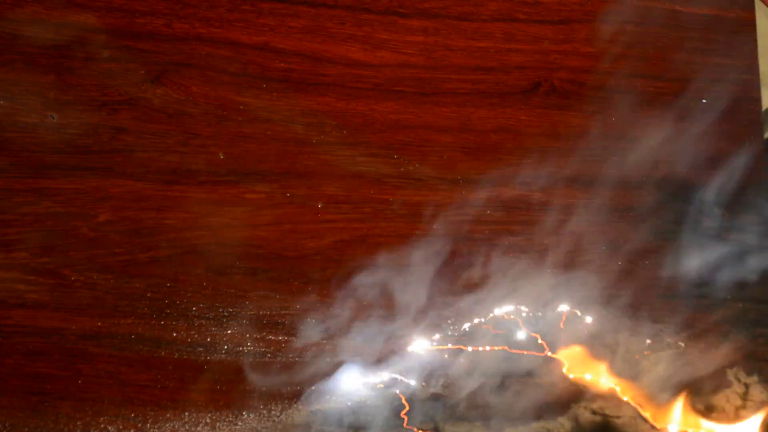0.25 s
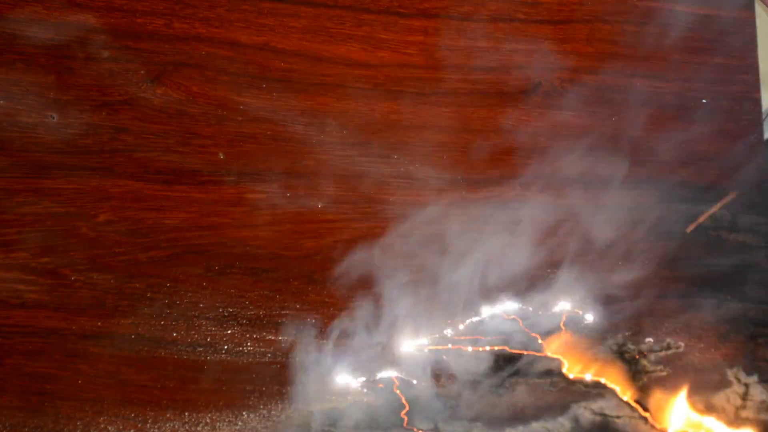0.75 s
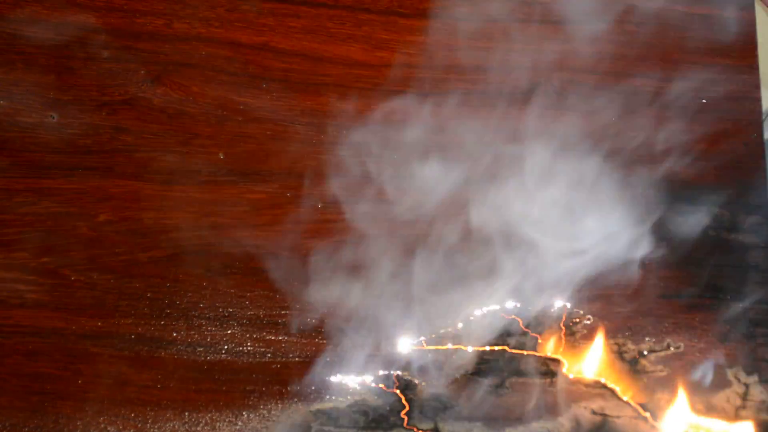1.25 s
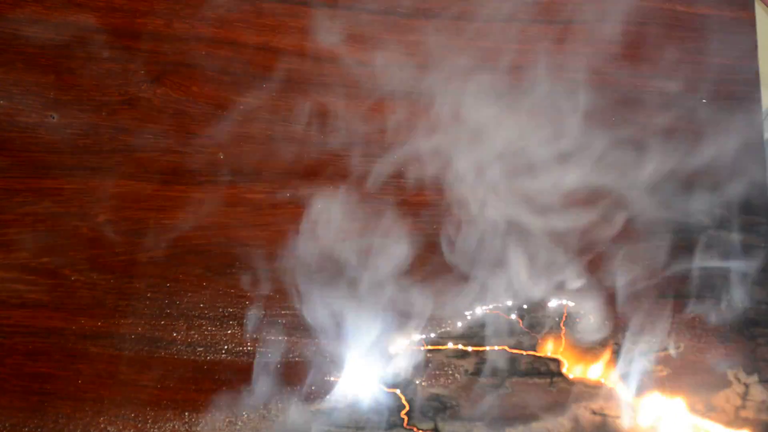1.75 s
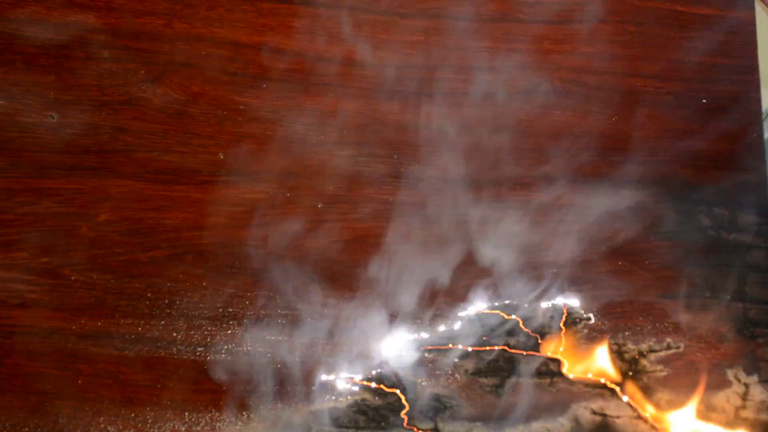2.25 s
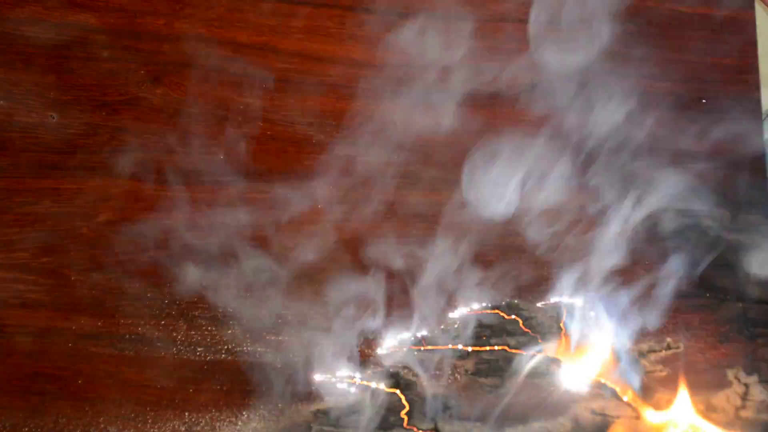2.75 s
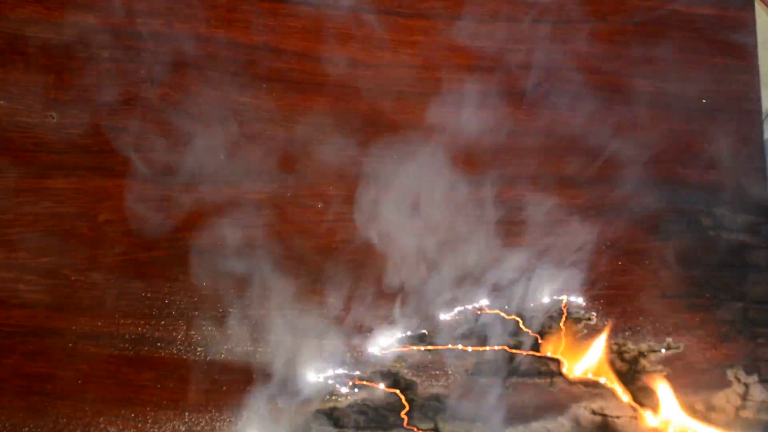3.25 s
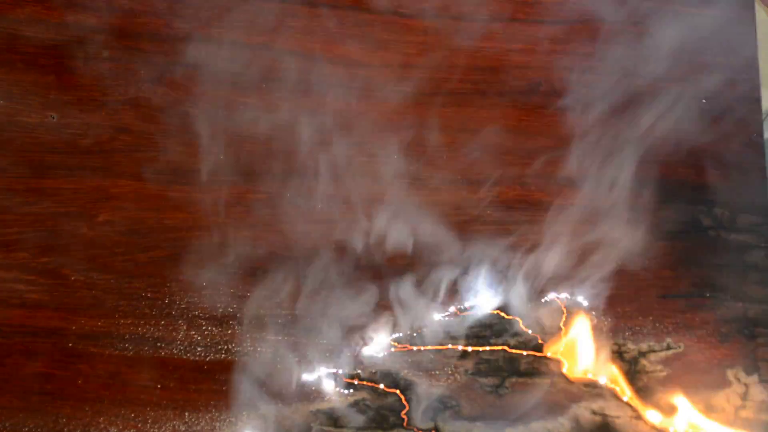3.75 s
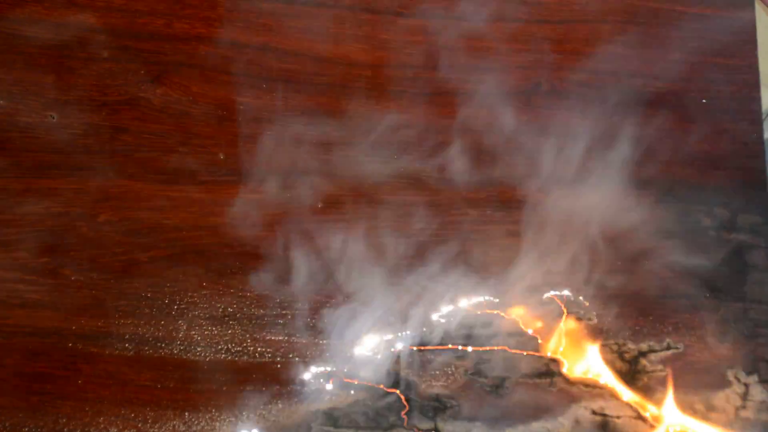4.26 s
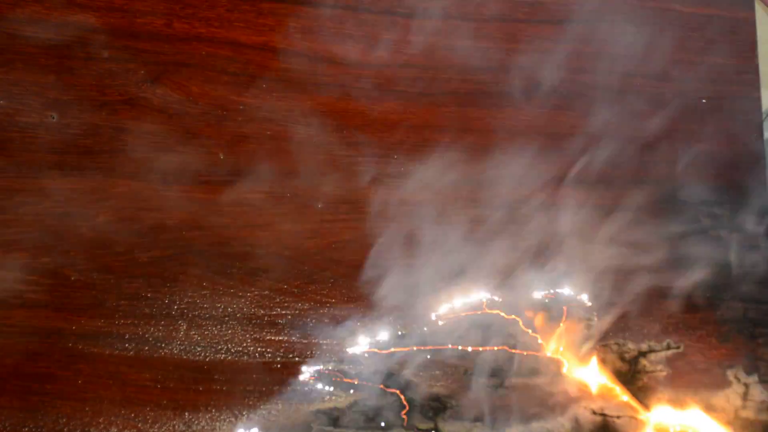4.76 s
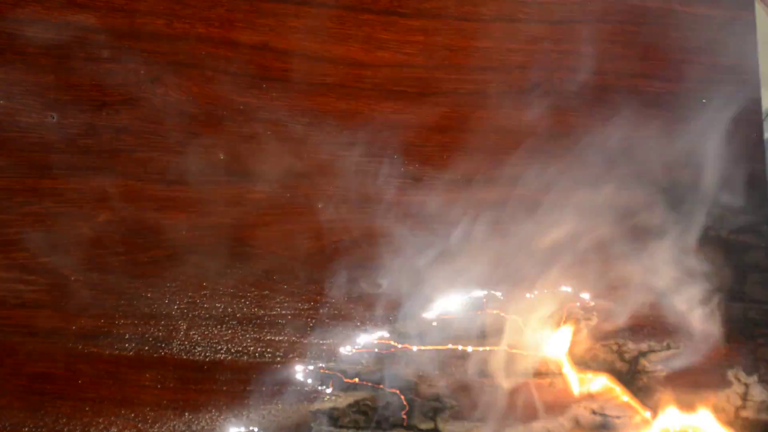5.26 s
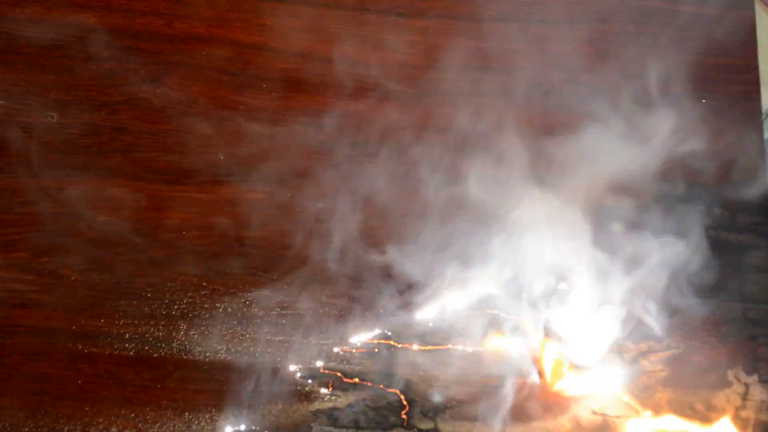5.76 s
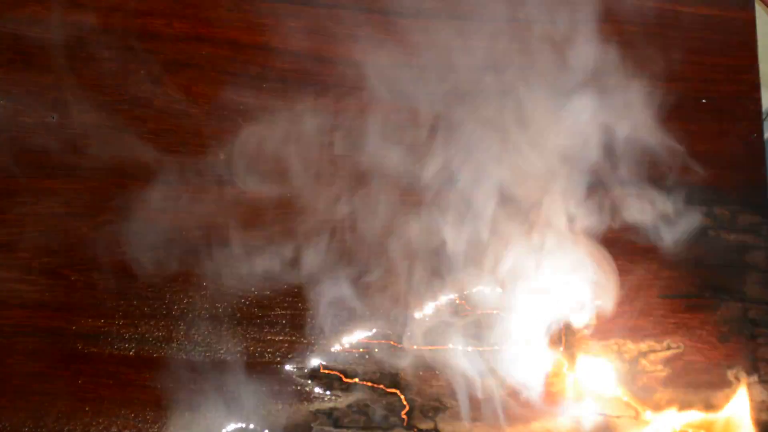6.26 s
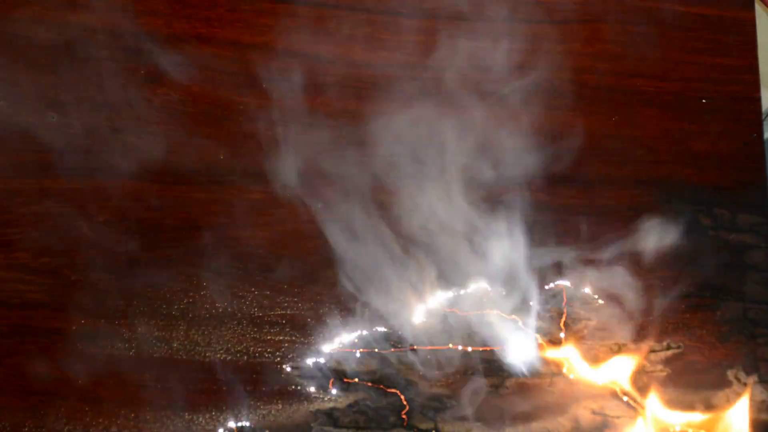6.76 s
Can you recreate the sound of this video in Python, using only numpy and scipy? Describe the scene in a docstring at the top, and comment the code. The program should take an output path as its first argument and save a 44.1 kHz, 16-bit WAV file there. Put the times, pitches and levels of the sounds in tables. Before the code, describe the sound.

Close in a small dry workshop, high-voltage arcs hiss with a mains-rate buzz over sizzling damp wood and a faint transformer hum. Dull woody pops and dry ticks come sparsely at first. Around three to four seconds bright sharp snaps and steam jets crowd in, one crack by far the loudest. Scattered pops, soft flame flaps and a brief crackle follow while the hiss continues.

```python
"""A transformer hums throughout, in mains multiples, as arcs on damp wood hiss and the track sizzles, in shaped noise.
From 0.2 s dull pops (noise bursts that ring the board) and dry ticks (filtered clicks) break out, with short steam rushes.
From 2.8 to 4 s bright snaps (short, high noise bursts) crowd in with steam jets (shaped noise), fiercest near 3.4 s.
Pops return from 4.5 s, most at 5.6 s; flames flap in low noise, once at 1.9 s and then between 4.5 and 6.4 s.
A spate of crackle comes at 6.2 s; arcs and sizzle run on to the end, in a small, short-ringing shop."""
import sys
import numpy as np
from scipy import signal
from scipy.fft import rfft, irfft, next_fast_len
from scipy.io import wavfile

SR = 44100
rng = np.random.default_rng(int(sys.argv[2]) if len(sys.argv) > 2 else 0)


def transcribe(u):
    """Save the signal u as a 16-bit wav file named by the first command-line argument.

    u: samples, shape (n,) or (channels, n), limited to [-1, 1]; the rate is SR.
    q: integer samples, one column per channel.
    """
    v = np.clip(np.atleast_2d(u).T, -1, 1)
    q = np.round(v * 32767).astype(np.int16)
    wavfile.write(sys.argv[1], SR, q)


def convert_level_to_amplitude(level_db):
    """Map a level in decibels to its linear amplitude factor."""
    exponent = np.asarray(level_db, float) / 20
    return 10 ** exponent


N = 309141

# Room air. Each row: frequency in Hz, level in dB per Hz.
ROOM_TONE_HZ_DB = [(20, -125), (50, -108), (90, -106), (200, -100), (500, -104), (2000, -115)]
# Transformer hum. Each row: multiple of the mains, level in dB rms.
HUM_MULTIPLE_DB = [(1, -92.5), (2, -69.5), (3, -74), (4, -67), (6, -81), (8, -75), (10, -77), (12, -79.5)]
# Side signal of the vents. Each row: frequency in Hz, gain in dB.
SIDE_HZ_DB = [(300, -26), (1200, -25), (5000, -16), (8000, -10), (14000, -9)]
# Flame flaring up. Each row: start of hold in seconds, hold in seconds, flutter level in dB.
FLARE_EVENTS = [(1.87, 0.027, -76), (4.47, 0.043, -71), (5.573, 0.02, -54), (5.62, 0.065, -64),
                (5.977, .01, -65), (6.163, .08, -81), (6.28, .015, -72), (6.32, 0.059, -71)]
# Air shoved aside as a pocket blows out. Each row: start in seconds, relative level in dB.
PUSH_EVENTS = [(3.4376, -39.5), (3.506, -52), (3.539, -43)]
# A crust gives way in extra ticks: start of hold in seconds, hold in seconds, ticks per second before clumping.
CRUST_SPATE = (6.17, 0.078, 710)
# Lone dry ticks of cracking char. Each row: start in seconds, peak in dB, pitch in Hz.
CHAR_TICKS = [(.2056, -29, 3000), (0.5997, -29, 2400), (.6043, -39, 1410), (.6158, -39, 1300),
              (.6493, -36, 2700), (1.2553, -27, 4500), (1.8837, -36, 2480), (3.7918, -33, 4000),
              (4.627, -27.5, 2300), (5.96, -39, 1300), (5.9928, -32, 2400), (6.1595, -30, 1290),
              (6.166, -32, 1700), (6.1678, -35, 2600), (6.194, -34, 1300), (6.2093, -35, 2200),
              (6.2455, -35, 1300), (6.2538, -35.5, 1090), (6.2654, -36, 2000), (6.279, -36.5, 700),
              (6.2992, -35, 1300), (6.3866, -34, 1400)]
# Modes of the board. Each row: frequency in Hz, relative level in dB, T60 in seconds.
BOARD_MODES = [(367, -25, .09), (443, -2, 0.26), (870, 4, .09), (1097, -8, 0.13), (1367, 2, 0.07),
               (1570, -6.5, .06), (1930, -4.5, 0.19), (2194, -6, 0.11), (2600, -12, 0.075),
               (3000, -19, 0.1), (3360, -29, .05)]
# Dull pops in the wood. Each row: time in seconds, burst peak in dB, pitch in Hz, relative thud level in dB
# (280 to 560 Hz), rise in ms.
POP_EVENTS = [(.2055, -29.5, 1340, -47, 0.27), (0.2049, -28.5, 2170, -58, 0.17),
              (.222, -42, 1110, -63, 7.2), (0.25, -38.5, 1940, -54, 7.3), (0.313, -48, 516, -51, 0.5),
              (0.414, -39, 1420, -46, 0.73), (0.4127, -43, 498, -61, 0.18), (.505, -43, 1110, -63, 3.),
              (0.439, -35, 1850, -54, 4.), (.465, -35, 4300, -70, 5.), (.458, -29.5, 2200, -56, 9.),
              (.698, -39, 2300, -70, 6.), (.722, -36, 1730, -68, 4.), (0.733, -43, 1600, -70, 2.2),
              (.75, -46, 1300, -70, 4.4), (1.252, -38, 2400, -65, 3.5), (1.2562, -33, 4280, -68, 1.),
              (1.2557, -30, 2270, -60, 0.78), (1.257, -33, 1700, -62, .8), (1.2603, -30, 1250, -58, 0.3),
              (1.417, -36.5, 1500, -55, 3.2), (1.425, -43, 1030, -65, 7.3), (1.44, -49, 950, -62, 5.3),
              (1.519, -41, 2230, -66, 8.5), (1.54, -45, 1800, -66, 8.3), (1.875, -38, 443, -45, 1.2),
              (1.88, -27, 2320, -53, 1.76), (1.883, -29, 975, -42, 1.16), (1.888, -34, 950, -50, 1.4),
              (1.895, -38, 2400, -55, 4.98), (2.283, -35.5, 3440, -65, 3.4),
              (2.7315, -30.5, 4470, -68, 0.19), (2.7322, -31.5, 1530, -66, 0.22),
              (2.7374, -26.5, 2120, -62, 0.25), (2.782, -40, 1770, -60, 8.3),
              (3.4385, -51, 1880, -36.5, 0.49), (3.4385, -36.5, 474, -40.5, 0.28),
              (3.927, -37.5, 1790, -60, 8.), (4.481, -44.5, 400, -44, 2.8), (4.897, -42, 2520, -65, 0.4),
              (5.5616, -33.5, 920, -44, 0.17), (5.5616, -25, 1900, -57, 1.15), (5.567, -36, 2030, -43, 0.9),
              (5.572, -37.5, 840, -60, 3.34), (5.581, -46, 1850, -46, 3.2),
              (5.9944, -37.5, 1660, -50, 0.25), (6.168, -39, 1900, -49, 2.4)]
# Bright snaps of bursting fibres. Each row: time in seconds, burst peak in dB, pitch in Hz,
# relative body level in dB (1.3 to 3.3 kHz).
SNAP_EVENTS = [(2.8208, -22, 14500, -51.5), (2.8265, -23, 14900, -53), (2.831, -26, 9500, -55),
               (2.8435, -24.5, 9800, -52), (2.971, -14.5, 14500, -47), (3.0695, -21, 6000, -50),
               (3.07, -18, 14200, -50), (3.2217, -15, 9500, -31.5), (3.2306, -14.5, 6300, -33),
               (3.2307, -12.5, 11000, -45), (3.321, -31, 5230, -41), (3.327, -28, 8900, -48),
               (3.426, -24, 12500, -59), (3.437, -3, 10200, -27), (3.446, -5, 9700, -39),
               (3.451, -7, 10000, -42), (3.47, -11.5, 12600, -49), (3.47, -15, 8500, -40),
               (3.4785, -16, 9700, -41), (3.506, -10, 14000, -42), (3.525, -12.5, 11600, -47),
               (3.5403, -7, 12600, -24), (3.5857, -20, 14000, -45), (3.593, -13.5, 8200, -48),
               (3.6887, -34, 4320, -30), (3.6945, -8, 6300, -27), (3.8106, -32.5, 4230, -59),
               (3.932, -22.5, 6000, -50), (4.026, -26, 8350, -53)]
# Steam jets. Each row: time of full flow in seconds, swell in dB per second, hold in seconds,
# low rush level in dB, high rush level in dB.
JET_EVENTS = [(0.454, 450, 0.019, -41, -42), (2.825, 900, 0.11, -69, -47), (0.72, 400, .03, -50, -62),
              (1.52, 300, .07, -50.5, -62), (2.987, 141, 0.064, -36, -34), (3.079, 200, 0.031, -43, -40),
              (3.438, 25000, 0.0072, -31, -24.5), (3.448, 4000, 0.0073, -32, -22.5),
              (3.478, 600, 0.11, -34, -29.5), (3.552, 138, 0.053, -40.5, -45),
              (3.592, 5000, 0.0011, -45, -28.5), (3.933, 8000, .003, -56, -40)]
# Jet colour, with a steep cutoff above 15.75 kHz that is not the steam's own.
# Each row: frequency in Hz, gain in dB.
JET_HZ_DB = [(150, -43), (330, -23), (670, -12), (1200, -4.5), (2200, -4), (3200, -7.5), (4300, -6),
             (6000, -7), (8400, -6.5), (12800, -7), (15750, -6.5), (16100, -45)]
# How fiercely the track burns. Each row: time in seconds, arc hiss level in dB, relative sizzle level in dB.
BURN_CURVE = [(0.0, -49, -46), (0.36, -47.5, -48.5), (0.67, -48, -47.5), (0.89, -50, -50.5),
              (1.19, -51.5, -50.5), (1.41, -50, -50), (1.84, -51, -49.5), (2.18, -47.5, -49.5),
              (2.53, -50, -51.5), (2.7, -49.5, -50), (3.75, -49, -50), (4.11, -50, -51),
              (4.5, -48.5, -50.5), (5.3, -49, -52), (5.65, -49.5, -52.5), (6.19, -50.5, -48.5),
              (6.67, -46.5, -53), (7.01, -48.5, -51)]
# Sizzle colour. Each row: frequency in Hz, gain in dB.
SIZZLE_HZ_DB = [(60, -31), (150, -14.5), (270, -8.5), (470, -4), (900, -1), (1800, -3.5), (3500, -6.5),
                (9000, -13), (13000, -25)]
# Current peaks of the two polarities. Each row: place in the mains cycle (0-1), sharpness, relative level in dB.
CURRENT_PEAKS = [(.435, 8.6, -6), (.87, 19, -10), (.995, 13, -6.5)]
# Arc colour, with a steep cutoff above 15.75 kHz that is not the arcs' own.
# Each row: frequency in Hz, gain in dB.
ARC_HZ_DB = [(400, -40), (700, -6), (1800, -7.5), (2400, -5.5), (5900, -7), (9200, -3.5), (11100, -2.5),
             (14000, 0.5), (15750, 1.5), (16100, -51)]

MAINS_HZ = 59.985
SHOP_T60_S, SHOP_DB, WALL_CUT_HZ = 0.1, -23.5, 43000
BENCH_ECHO_S, BENCH_ECHO_DB = 0.0018, -6.0
CUTOFF_HZ = 17000
FLARE_SWELL_DB_PER_S, FLARE_FADE_DB_PER_S = 500, 350
PUSH_RISE_S = 0.00089
# rate at a relative sizzle of -50 dB, before clumping; dB of rate per dB of sizzle
TICKS_PER_S, TICKS_FOLLOW_DB_PER_DB = 105, 2.1
TICK_WIDTH = 2  # band spans this factor either side of the pitch
BOARD_DB = -21.0
# T60 of a fast pop at -40 dB; more per 10 dB of peak and per ms of rise
POP_T60_S, POP_SIZE_GAIN_S, POP_RISE_GAIN_S = 0.075, 0.039, 0.012
# T60 at 10 kHz, longer for deeper snaps by this power of the pitch
SNAP_RISE_MS, SNAP_T60_S, SNAP_T60_POWER = 0.25, 0.048, 1
# sag as the pocket empties; least closing rate as the crack shuts
JET_SAG_DB_PER_S, JET_CLOSE_DB_PER_S = 44, 448
JET_CLOSE_SHARE = 0.78  # a crack that bursts open also shuts fast: share of its swell rate


def rms_one(x):
    """Scale to unit rms."""
    return x / np.sqrt(np.mean(x ** 2) + 1e-20)


def in_time(rows):
    """Each column of a table as a curve, sample by sample."""
    time_s, *columns = np.transpose(rows)
    return [np.interp(np.arange(N) / SR, time_s, column) for column in columns]


def shape(x, spectrum):
    """Colour a sound by a (Hz, dB) spectrum, interpolated over log frequency."""
    size = next_fast_len(N)
    hz = np.maximum(np.arange(size // 2 + 1) * SR / size, 1)
    point_hz, point_db = np.transpose(spectrum)
    gain = convert_level_to_amplitude(np.interp(np.log(hz), np.log(point_hz), point_db))
    return irfft(rfft(x, size) * gain, size)[..., :N]


def band(x, low_hz, high_hz):
    """Band-pass."""
    edges_hz = [low_hz, min(high_hz, 0.45 * SR)]
    return signal.sosfilt(signal.butter(2, edges_hz, "band", fs=SR, output="sos"), x)


def level(x, low_hz, high_hz):
    """Scale so that one band has unit rms."""
    return x / np.sqrt(np.mean(band(x, low_hz, high_hz) ** 2))


def drift(rate_hz):
    """Slow chance of unit rms: noise through two equal poles, computed every 40 samples."""
    r = np.exp(-80 * np.pi * rate_hz / SR)
    noise = rng.standard_normal(N // 40 + 2002)
    slow = signal.lfilter([1], [1, -2 * r, r * r], noise)[2000:]
    return np.interp(np.arange(N) / 40, np.arange(len(slow)), rms_one(slow))


def grains(per_s, spread_db):
    """Random clicks with a long-tailed spread of sizes."""
    sizes = convert_level_to_amplitude(spread_db * np.minimum(rng.exponential(1, N), 5)) * rng.choice([-1, 1], N)
    return sizes * (rng.random(N) < per_s / SR)


def envelope(at_s, hold_s, swell_db_per_s, fade_db_per_s, sag_db_per_s=0):
    """Gain that swells to 1, holds while sagging, then fades."""
    t = np.arange(N) / SR - at_s
    swell_db = abs(swell_db_per_s) * np.minimum(t, 0)
    sag_db = sag_db_per_s * np.clip(t, 0, hold_s)
    fade_db = fade_db_per_s * np.maximum(t - hold_s, 0)
    return convert_level_to_amplitude(np.maximum(swell_db - sag_db - fade_db, -120))


def along_track(x, spectrum, low_hz, high_hz, side_db):
    """Every grain comes from its own spot on the board, a little to the left or right."""
    scattered = convert_level_to_amplitude(side_db) * x * rng.choice([-1, 1], N)
    mid, side = shape(np.array([x, scattered]), spectrum)
    return level(mid + side * np.array([[1], [-1]]), low_hz, high_hz)


def bursts(events, width, crack_s, tail_db, wide_db, skirt, strike_db, body_hz, body_db):
    """A short crack, then a puff that dies away; both gather round the pitch, over a broad skirt and a body band."""
    out, t = np.zeros(N), np.arange(SR // 4) / SR
    for time_s, peak_db, hz, t60_s, event_body_db, rise_ms in events:
        noise = rng.standard_normal((2, len(t)))
        rise_s = rise_ms / 1000
        rise = np.minimum(1000 * t / np.clip(rise_ms, 0.05, 15), 1)
        after_s = np.maximum(t - rise_s, 0)
        tail = convert_level_to_amplitude(-60 * after_s / np.clip(t60_s, 0.005, 0.4))
        # a slow vent has a blunt crack
        crack = np.exp(-after_s / (crack_s + rise_s))
        puff = noise[0] * rise * (crack + convert_level_to_amplitude(tail_db) * tail)
        # the instant the wall gives way
        puff[round(rise_s * SR)] += convert_level_to_amplitude(strike_db) * np.sqrt(crack_s * SR)
        # the slower the vent, the vaguer the pitch
        spread = width + 0.0059 * rise_ms
        core = rms_one(band(puff, hz / spread, hz * spread))
        wide_hz = hz * skirt[0], hz * skirt[1]
        wide = rms_one(band(band(puff, *wide_hz), *wide_hz))
        burst = core + convert_level_to_amplitude(wide_db) * wide
        burst = convert_level_to_amplitude(peak_db) * burst / np.abs(burst).max()
        body = convert_level_to_amplitude(body_db) * rms_one(band(noise[1], *body_hz))
        body = body * tail * np.minimum(t / 0.0013, 1) * rise
        at = round((time_s - rise_s / 2) * SR)
        out[at:at + len(t)] += (burst + convert_level_to_amplitude(event_body_db) * body)[:N - at]
    return out


def room_tone():
    """Quiet low air of the shop, unlike in the two channels."""
    return shape(rng.standard_normal((2, N)) * np.sqrt(SR / 2), ROOM_TONE_HZ_DB)


def shop(x):
    """Six feedback delays a side, duller on every round."""
    size = next_fast_len(N + SR // 2)
    hz = np.arange(size // 2 + 1) * SR / size
    source, out = rfft(x, size), np.zeros((2, len(hz)), complex)
    for k, lag_s in enumerate(rng.uniform(0.0076, 0.032, 12)):
        delay = np.exp(-2j * np.pi * hz * lag_s)
        loop = convert_level_to_amplitude(-60 * lag_s / SHOP_T60_S) * delay / (1 + 1j * hz / WALL_CUT_HZ)
        out[k % 2] += loop / (1 - loop) * (-1) ** (k // 2)
    return irfft(out * source, size)[:, :N]


def hum():
    """Core and windings buzz on multiples of the mains, each wavering a little."""
    t = np.arange(N) / SR
    out = np.zeros(N)
    for k, db in HUM_MULTIPLE_DB:
        gain = np.sqrt(2) * convert_level_to_amplitude(db + 0.059 * k * drift(0.54))
        out += gain * np.sin(2 * np.pi * (k * MAINS_HZ * t + rng.random()))
    return out


def flares():
    """The flame flaps as fresh gas lights: lumpy low noise."""
    flap = band(band(rng.standard_normal(N), 95, 290), 95, 290) * convert_level_to_amplitude(1.5 * drift(25))
    gain = sum(convert_level_to_amplitude(db) * envelope(at_s, hold_s, FLARE_SWELL_DB_PER_S, FLARE_FADE_DB_PER_S)
               for at_s, hold_s, db in FLARE_EVENTS)
    return gain * rms_one(flap)


def pushes():
    """One slow pulse of pressure each."""
    start_s, push_db = np.transpose(PUSH_EVENTS)
    t = np.maximum(np.arange(N) / SR - start_s[:, None], 0) / PUSH_RISE_S
    return convert_level_to_amplitude(push_db - 7.5) @ (t * np.exp(1 - t))


def crackle(sizzle_db, tick_db=-34.0):
    """Small dull ticks that come in clumps, thicker as the sizzle grows."""
    at_s, hold_s, spate_per_s = CRUST_SPATE
    per_s = TICKS_PER_S * convert_level_to_amplitude(TICKS_FOLLOW_DB_PER_DB * (sizzle_db + 50))
    per_s = per_s + spate_per_s * envelope(at_s, hold_s, swell_db_per_s=304, fade_db_per_s=120)
    clicks = grains(per_s * convert_level_to_amplitude(2.2 * drift(8)), spread_db=3)
    return convert_level_to_amplitude(tick_db) * band(clicks, 660, 3900)


def ticks():
    """One click each, through a broad band: a cycle or two and gone."""
    out, click = np.zeros(N), np.r_[1., np.zeros(400)]
    for start_s, peak_db, hz in CHAR_TICKS:
        tick = band(click, hz / TICK_WIDTH, hz * TICK_WIDTH)
        at = round(start_s * SR)
        out[at:at + len(tick)] += convert_level_to_amplitude(peak_db) * tick / np.abs(tick).max()
    return out


def board(x):
    """Every knock rings the board briefly on its modes, each a two-pole resonator."""
    out = 0
    for k, (hz, db, t60_s) in enumerate(BOARD_MODES):
        r, w = convert_level_to_amplitude(-60 / (t60_s * SR)), 2 * np.pi * hz / SR
        strike, poles = [0, np.sin(w) * w / (2 * np.pi)], [1, -2 * r * np.cos(w), r * r]
        out = out + (-1) ** k * convert_level_to_amplitude(db) * signal.lfilter(strike, poles, x + 1e-18)
    return convert_level_to_amplitude(BOARD_DB) * out


def pops():
    """Pockets vent in dull bursts over a low thud, the larger and slower ones dying longer."""
    rows = []
    for time_s, db, hz, thud_db, rise_ms in POP_EVENTS:
        t60_s = POP_T60_S + POP_SIZE_GAIN_S * (db + 40) / 10 + POP_RISE_GAIN_S * rise_ms
        rows.append((time_s, db, hz, t60_s, thud_db, rise_ms))
    return bursts(rows, width=1.177, crack_s=0.00062, tail_db=-7.0, wide_db=-4.0, skirt=(0.45, 1.53),
                  strike_db=4.0, body_hz=(280, 560), body_db=-6.0)


def snaps():
    """Fibres burst in bright cracks that all rise alike, the deeper ones dying longer."""
    rows = []
    for time_s, db, hz, body_db in SNAP_EVENTS:
        t60_s = SNAP_T60_S * (10000 / hz) ** SNAP_T60_POWER
        rows.append((time_s, db, hz, t60_s, body_db, SNAP_RISE_MS))
    return bursts(rows, width=1.09, crack_s=0.0006, tail_db=-11.5, wide_db=6.0, skirt=(0.62, 2.1),
                  strike_db=0.5, body_hz=(1300, 3300), body_db=-10.0)


def jets(split_hz=4500):
    """Steam forced through a crack: a rush with a little grit, duller or brighter from jet to jet."""
    flows = []
    for at_s, swell, hold_s, *_ in JET_EVENTS:
        close = max(JET_CLOSE_DB_PER_S, JET_CLOSE_SHARE * swell)
        flows.append(envelope(at_s, hold_s, swell, close, JET_SAG_DB_PER_S))
    rush_db = np.array(JET_EVENTS)[:, 3:].T
    low_gain, high_gain = np.sqrt(convert_level_to_amplitude(2 * rush_db) @ np.array(flows) ** 2)
    grit = convert_level_to_amplitude(-8) * rms_one(grains(3000, spread_db=2.2))
    rush = shape(rng.standard_normal(N) + grit, JET_HZ_DB) * convert_level_to_amplitude(1.2 * drift(60))
    low = signal.sosfilt(signal.butter(2, split_hz, fs=SR, output="sos"), rush)
    return low_gain * level(low, 600, 6800) + high_gain * level(rush - low, 4400, 17900)


def sizzle(sizzle_db):
    """Damp wood boiling along the track: smooth noise, wavering a little."""
    boil = along_track(rng.standard_normal(N), SIZZLE_HZ_DB, 400, 6100, side_db=-14.5)
    return convert_level_to_amplitude(sizzle_db - 4.0 + 1.5 * drift(9.6)) * boil


def arcs(arc_db, between_db=-14.5, cycle_db=1.0):
    """Sparks crowd round each current peak; one polarity strikes harder, the other in two goes, each half apart."""
    cycle = MAINS_HZ * np.arange(N) / SR
    power = sum(convert_level_to_amplitude(2 * db) * np.exp(sharpness * (np.cos(2 * np.pi * (cycle - place)) - 1))
                for place, sharpness, db in CURRENT_PEAKS)
    # no two half cycles are alike
    half = (2 * cycle + 0.6).astype(int)
    half_gain = convert_level_to_amplitude(cycle_db * rng.standard_normal(half[-1] + 1))[half]
    power = power * half_gain ** 2 + convert_level_to_amplitude(2 * between_db)
    sparks = grains(20000, spread_db=2.5) * np.sqrt(power)
    hiss = along_track(sparks, ARC_HZ_DB, 6000, 14540, side_db=-10.0)
    return convert_level_to_amplitude(arc_db + 0.5 * drift(13)) * hiss


def scene():
    """All of it on the board, the bright snaps doubled by the bench top, then the room."""
    arc_db, sizzle_db = in_time(BURN_CURVE)
    knocks = pops() + ticks()
    knocks = knocks + board(knocks)
    bright = snaps()
    vents = jets() + knocks + bright + pushes()
    lag = round(BENCH_ECHO_S * SR)
    vents[lag:] += convert_level_to_amplitude(BENCH_ECHO_DB) * bright[:-lag]
    spread = arcs(arc_db) + sizzle(sizzle_db) + crackle(sizzle_db) + flares()
    # a vent off to one side reaches the two close microphone ports with a small shift of phase
    quadrature = signal.hilbert(vents, next_fast_len(N))[:N].imag
    side = shape(quadrature, SIDE_HZ_DB)
    near = vents + spread + hum() - side * np.array([[1], [-1]])
    wet = shop(spread.mean(axis=0) + vents)
    balance = convert_level_to_amplitude(np.array([[-0.35], [0.35]]))
    return (near + convert_level_to_amplitude(SHOP_DB) * wet + room_tone()) * balance


def top_cut(x):
    """Nothing passes above the cut-off."""
    return signal.sosfilt(signal.butter(12, 17000, fs=SR, output="sos"), x)


def record(dry):
    """A steep low-pass cuts the top."""
    cut = signal.sosfilt(signal.cheby2(12, 60, CUTOFF_HZ, fs=SR, output="sos"), dry)
    return top_cut(cut)


dry = scene()
out = record(dry)
transcribe(out)
```